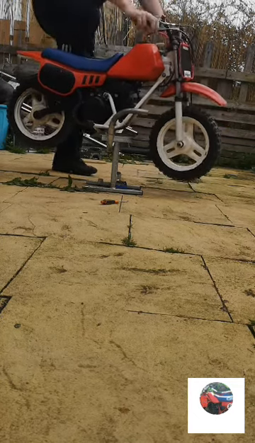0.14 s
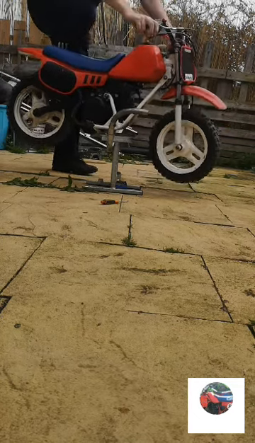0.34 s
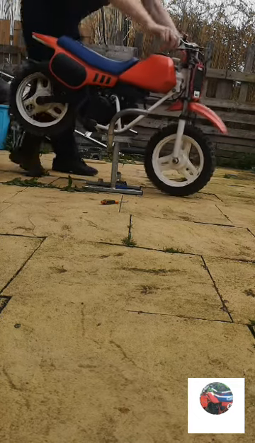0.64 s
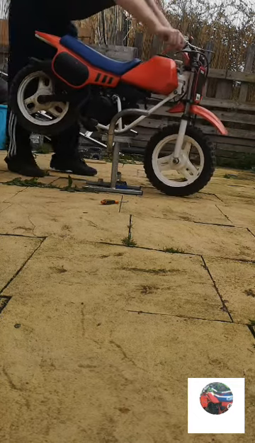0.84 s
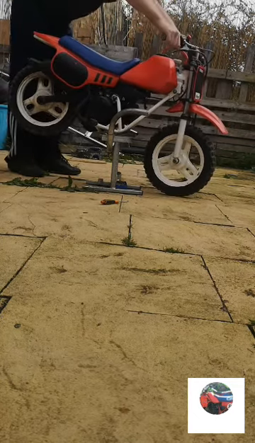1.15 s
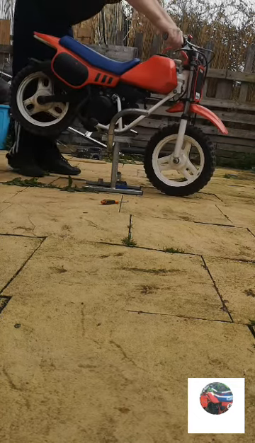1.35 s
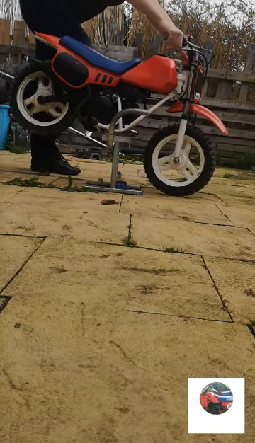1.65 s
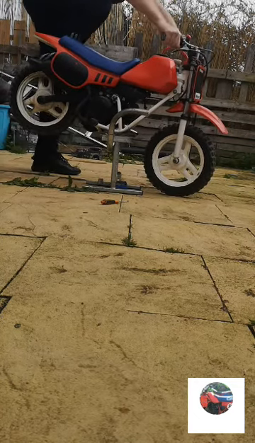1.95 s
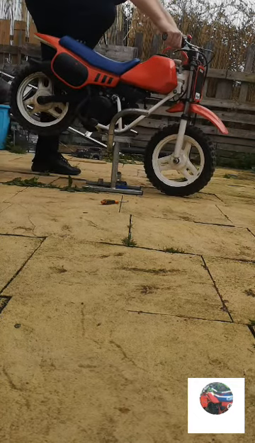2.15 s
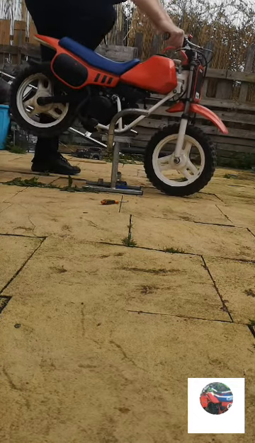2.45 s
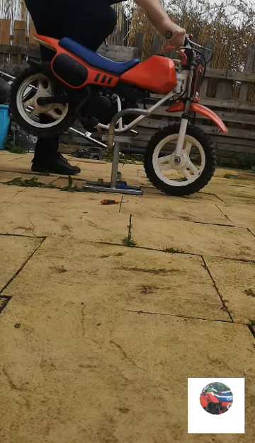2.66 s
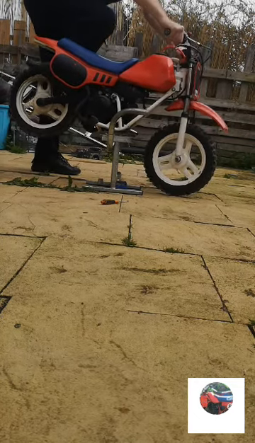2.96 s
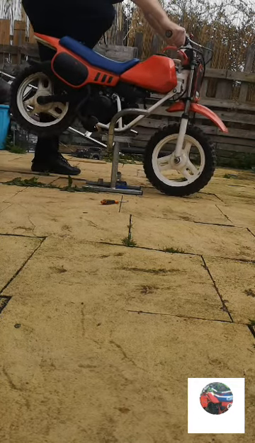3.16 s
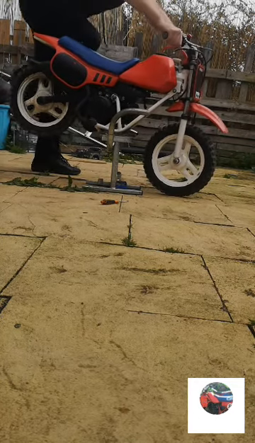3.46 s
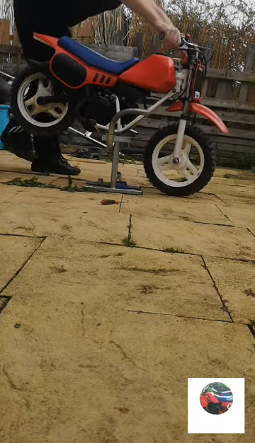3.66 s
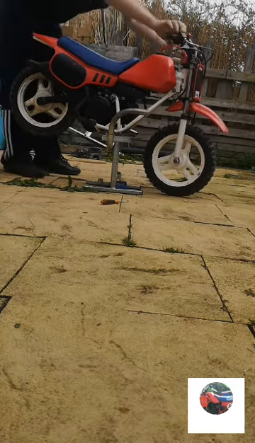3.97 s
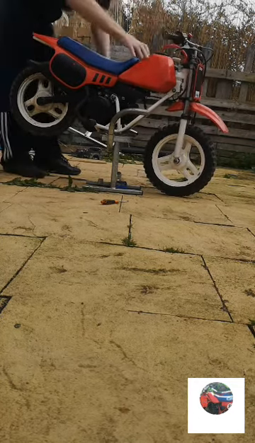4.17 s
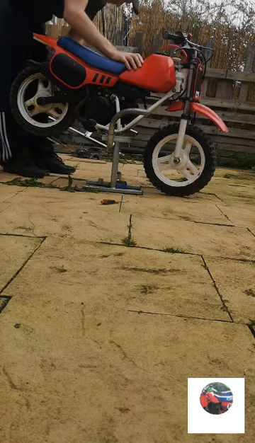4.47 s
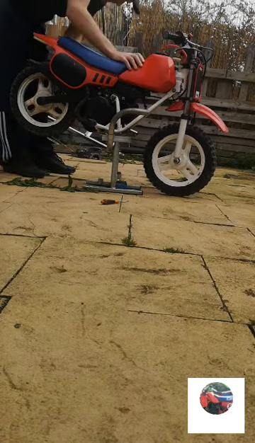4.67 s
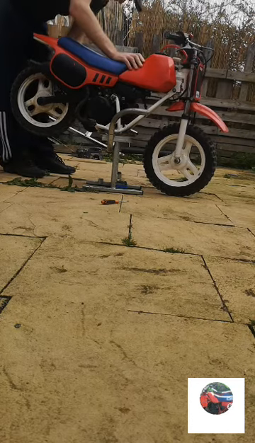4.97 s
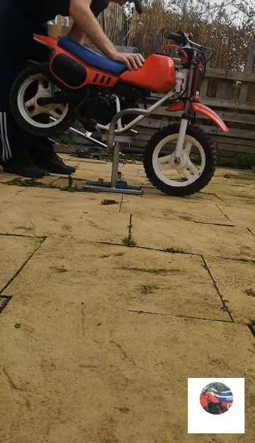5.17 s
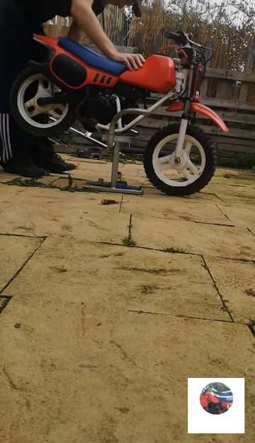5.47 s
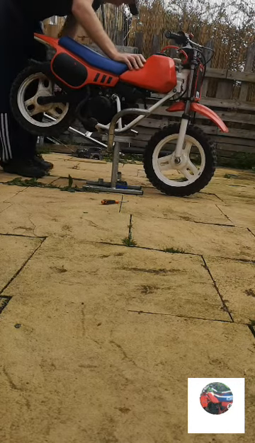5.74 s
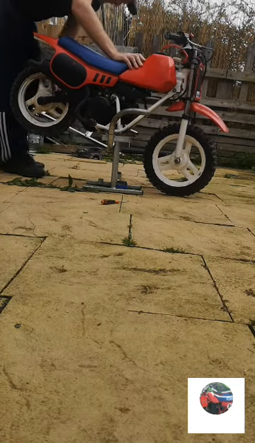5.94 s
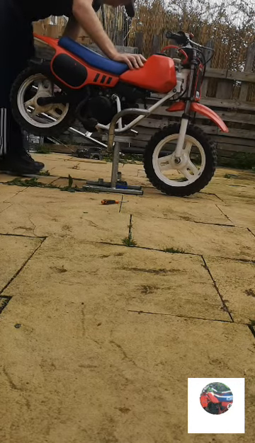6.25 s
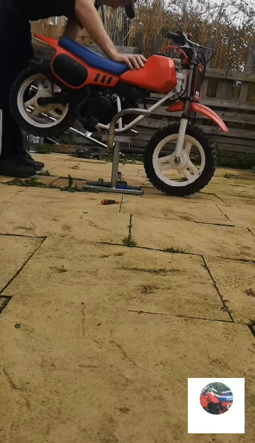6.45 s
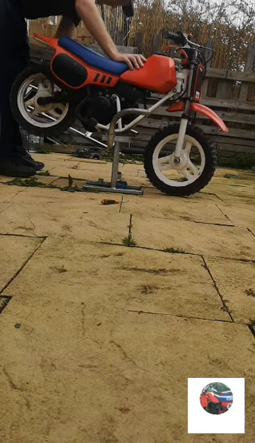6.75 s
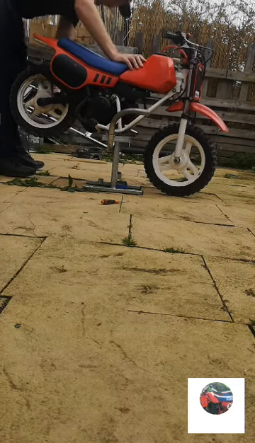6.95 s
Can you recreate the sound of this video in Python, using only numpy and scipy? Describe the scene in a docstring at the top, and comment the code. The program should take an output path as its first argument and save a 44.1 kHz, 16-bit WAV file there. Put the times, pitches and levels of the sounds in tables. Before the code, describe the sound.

A small motorbike rocks on its steel stand close to the microphones in a paved yard. After faint scuffs, a sharp, briefly ringing clank at 0.5 seconds is the loudest sound; a second follows at 0.8, and the front tyre lands with a dull, rattling thud at 0.9. A shoe scuffs at 1.2. The middle is quiet, with tiny ticks, a hoarse distant bird and a songbird on the left singing faintly from 1.5 to 2.4. Traffic rumbles softly throughout, and a faint motor hum comes nearer around 4 seconds. Soft scuffs and barely audible sleeve rubbing follow from 4.3. The songbird twitters, then repeats its phrase more clearly from 4.8, ending in a falling whistle at 5.6 as the harsher bird calls. The kick lever clacks against its stop at 5.4, 6.5 and 7 seconds, with lighter knocks between. The engine never fires.

```python
"""A paved yard, a stereo pair of microphones close to a small motorbike. It rocks on its steel stand:
two sharp clanks set stand and frame ringing, then the front tyre lands with a thud. Shoes scuff, sleeves
rub and the kick lever knocks on its stop; the engine never fires. Off to the left a songbird twitters
and whistles its phrase twice, faintly at first. Far off, a harsher bird calls, traffic rumbles and a
humming motor comes nearer."""
import sys
import numpy as np
from scipy import signal
from scipy.fft import rfft, irfft
from scipy.io import wavfile
from scipy.ndimage import uniform_filter1d

SR = 44100
rng = np.random.default_rng(int(sys.argv[2]) if len(sys.argv) > 2 else 0)


def digitize_waveform(pressure):
    """Quantize a signal to 16-bit integers and store it at the path in sys.argv[1].

    Rows of a 2-D input are taken as channels; values are limited to [-1, 1].
    """
    field = np.atleast_2d(pressure).T
    bounded = np.clip(field, -1, 1)
    quanta = np.round(bounded * 32767).astype(np.int16)
    wavfile.write(sys.argv[1], SR, quanta)


N = 313551
T = np.arange(int(.6 * SR)) / SR  # time axis of one impact or echo tail, in seconds


def amp(db):
    """Decibels to amplitude."""
    return 10 ** (np.asarray(db) / 20)


def unit(x):
    """Scales to rms 1."""
    return x / np.sqrt(np.mean(x ** 2) + 1e-20)


def read(points, hz):
    """A table's value on a log-frequency axis."""
    f, value = np.transpose(points)
    return np.interp(np.log(hz + 1), np.log(f + 1), value)


def add(mix, start_s, sound):
    """Mixes a sound in at start_s."""
    part = mix[:, max(round(start_s * SR), 0):][:, :sound.shape[-1]]
    part += sound[..., :part.shape[1]]


def hiss(gain, size=len(T)):
    """Two unrelated channels of noise with the spectrum gain(hz)."""
    white = rfft(rng.standard_normal((2, size)))
    return unit(irfft(white * gain(np.fft.rfftfreq(size, 1 / SR)), size))


def body(peaks):
    """The spectrum of damped resonances, each given as centre_hz, width_hz, level_db."""
    return lambda hz: np.sqrt(sum(amp(db) ** 2 / (1 + ((hz ** 2 - centre ** 2) / (width * hz + 1)) ** 2)
                                  for centre, width, db in peaks))


def dying(t60_s, rise_s=.0004):
    """A quick rise and an exponential fall."""
    return (1 - np.exp(-T / rise_s)) * np.exp(-np.log(1000) * T / t60_s)


def wander(size, span_s, per_s=SR):
    """A random drift of rms 1 that changes over span_s."""
    span = max(int(span_s * per_s), 1)
    return unit(uniform_filter1d(uniform_filter1d(rng.standard_normal(size), span), span))


def pan(x, balance):
    """Sets the left-right balance by frequency."""
    side_db = read(balance, np.fft.rfftfreq(N, 1 / SR)) / 2
    return irfft(rfft(x) * amp([side_db, -side_db]), N)


def microphone_pair(x):
    """Two closely spaced microphones hear long waves alike and most short waves differently."""
    # left-right likeness of near sounds: frequency_hz, correlation
    likeness = [(20, 1), (130, 1), (300, 0.0024), (700, 0.23), (1400, 0.95), (2400, 0.11), (16000, 0.14)]
    blend = np.arcsin(np.clip(read(likeness, np.fft.rfftfreq(N, 1 / SR)), 0, 1)) / 2
    spectrum = rfft(x)
    return irfft(np.cos(blend) * spectrum + np.sin(blend) * spectrum[::-1], N)


def yard(x, mean_gap_samples=20):
    """Scatter from slabs and fences: sparse echoes that linger longest in the midrange."""
    # the yard's decay: frequency_hz, t60_s
    decay = [(100, .2), (800, .28), (2000, 0.29), (4500, 0.27), (7000, 0.23), (15000, 0.21)]
    taps = rng.choice([-1., 1.], (2, len(T)))
    taps *= (rng.random(taps.shape) < 1 / mean_gap_samples) * (T > .004)
    hz, t, spectra = signal.stft(taps, SR, nperseg=256)
    fall = np.exp(-np.log(1000) * t / read(decay, hz)[:, None])
    tail = signal.istft(spectra * fall, SR, nperseg=256)[1]
    return signal.fftconvolve(x, tail / np.linalg.norm(tail, axis=1, keepdims=True), axes=1)[:, :N]


def fences(x, count=8, spread_s=0.037):
    """A handful of early echoes that smear far sounds."""
    taps = np.zeros((2, len(T)))
    lateness = rng.random((2, count))
    strength = rng.choice([-1., 1.], lateness.shape) * np.exp(-2 * lateness)
    np.put_along_axis(taps, (lateness * spread_s * SR).astype(int), strength, 1)
    return signal.fftconvolve(x, taps / np.linalg.norm(taps, axis=1, keepdims=True), axes=1)[:, :N]


def approach_db(t, start_s=3.8, length_s=0.75, far_db=-8.5):
    """The far motor's gain as it comes nearer once and stays."""
    return far_db * (1 - np.clip((t - start_s) / length_s, 0, 1))


def traffic_and_air(level_db=-57.5, rumble_hz=110, roar_hz=200, patchy_db=2.5):
    """Distant traffic, alike at both microphones and slowly swelling, under a faint airy hiss."""
    # the background's spectrum: frequency_hz, density_db
    air_spectrum = [(12, -36), (24, 0), (40, -4), (62, -1), (100, -7.5), (140, -11), (195, -16.5),
                    (280, -24.5), (450, -32.5), (1000, -32.5), (2020, -32.5), (4300, -40), (7310, -44),
                    (8890, -48.5), (15000, -50)]
    # its left-right likeness: frequency_hz, correlation
    likeness = [(20, 1), (100, 1), (180, .97), (300, .55), (640, -0.41), (1400, 0.19), (3100, -0.1),
                (16000, 0)]
    frames, hz = N // 1024 + 3, np.fft.rfftfreq(4096, 1 / SR)
    t = np.arange(frames) * 1024 / SR
    left_re, left_im, other_re, other_im, patches = rng.standard_normal((frames, len(hz), 5)).T
    same = np.clip(read(likeness, hz), -1, 1)[:, None]
    left = left_re + 1j * left_im
    right = same * left + np.sqrt(1 - same ** 2) * (other_re + 1j * other_im)
    sheen_db = 4 * np.exp(-((hz - 7550) / 250) ** 2)
    rumble_band = 1 / (1 + (hz[:, None] / rumble_hz) ** 4)
    roar_band = np.exp(-np.log2((hz + 1) / roar_hz) ** 2)
    patches = unit(uniform_filter1d(uniform_filter1d(patches, 16, 0), 6, 1))
    field_db = (read(air_spectrum, hz) + sheen_db)[:, None] + rumble_band * wander(frames, .4, 1 / t[1])
    field_db += np.outer(roar_band, 3 + .3 * approach_db(t))  # the roar grows with the far motor
    field_db += patchy_db * (1 - 0.6955 * rumble_band) * patches  # the bass flickers least
    air = signal.istft(np.array([left, right]) * amp(field_db), nperseg=4096, noverlap=3072)[1]
    return amp(level_db) * unit(air[:, :N])


def far_motor(waver=.012):
    """A distant motor's low tones, drifting together in pitch."""
    # its hum at the nearest: pitch_hz, level_db
    hum = [(112, -71.5), (196, -73)]
    t = np.arange(N) / SR
    drift = np.interp(t, np.linspace(0, t[-1], 40), rng.standard_normal(40))
    drifting_s = np.cumsum(1 + waver * drift) / SR
    tones = sum(amp(db) * np.sin(2 * np.pi * (hz * drifting_s + rng.random())) for hz, db in hum)
    return np.sqrt(2) * tones * amp(approach_db(t))


def far_bird(call_s=0.0557, roughness=0.072, fall=0.105):
    """A hoarse falling call whose second harmonic carries across the gardens."""
    # the calls: start_s, second_harmonic_hz, level_db
    calls = [(0.951, 2065, -64.5), (1.947, 2046, -72.5), (2.925, 2070, -63), (3.896, 2007, -69.5),
             (5.32, 2795, -69.5), (5.33, 2016, -72.5), (5.519, 3280, -67), (5.603, 2160, -53.5),
             (5.968, 1426, -67.5), (6.036, 1500, -72), (6.405, 2200, -67)]
    out = np.zeros((2, N))
    progress = np.linspace(0, 1, int(call_s * SR))
    for start_s, hz, db in calls:
        jitter = unit(uniform_filter1d(rng.standard_normal(len(progress)), 40))
        pitch_hz = hz / 2 * (1 + fall * (.5 - progress) + roughness * jitter)
        phase = 2 * np.pi * np.cumsum(pitch_hz) / SR
        call = amp(-17.5) * np.sin(phase) + np.sin(2 * phase) + amp(-18) * np.sin(3 * phase)
        add(out, start_s, amp(db) * call * signal.windows.tukey(len(call), .5))
    return amp(-1.5) * out + amp(2) * yard(out)


def syllable(name, db, tilt_db=0, pivot_hz=4500, buzz_hz=290):
    """A whistled slide that levels off; rising ones buzz, the falling one is pure and wavers a little."""
    # the songbird's slides by name: first_hz, last_hz, length_s, level_db, buzz_share_of_pitch
    slides = {"low": (3080, 3610, .026, -3.5, .03), "chip": (3800, 4320, .02, 0, .03),
              "mid": (4480, 5100, .024, 0, .035), "pip": (5540, 6180, .029, -1, .025),
              "under": (3350, 4140, .04, -5, .04), "slur": (4780, 5850, .052, 0, .04),
              "flick": (5420, 7850, .015, -5, .03), "high": (7200, 7840, .028, 1.5, .025),
              "buzz": (3820, 4980, .052, 3, .05), "whistle": (5380, 4715, .118, 12, 0)}
    first_hz, last_hz, length_s, own_db, buzz = slides[name]
    progress = np.linspace(0, 1, int(length_s * SR))
    arch = np.abs(np.sin(np.pi * progress))
    hz = last_hz + (first_hz - last_hz) * (1 - progress) ** 2.03
    jitter = unit(uniform_filter1d(rng.standard_normal(len(hz)), 50))
    if last_hz > first_hz:
        hz *= 1 + buzz * np.sin(2 * np.pi * buzz_hz * length_s * progress) + 0.018 * jitter
    else:
        hz *= 1 + 0.003 * jitter + 0.0048 * wander(len(hz), 0.0099) - 0.017 * arch
    gain = amp(db + own_db + tilt_db * np.log2(hz / pivot_hz))
    return gain * np.sin(2 * np.pi * np.cumsum(hz) / SR) * arch ** 1.43


def songbird(crescendo_db_per_s=6.5, left_lead_s=.0007):
    """Off to the left, loose twitters lead into a swelling phrase; the fences throw it back."""
    # loose notes: start_s, syllable, level_db
    twitters = [(1.005, "low", -67), (1.341, "chip", -72.5), (1.405, "mid", -72.5), (3.35, "low", -64),
                (3.409, "mid", -73), (3.852, "buzz", -76), (3.958, "chip", -64), (4.414, "mid", -65),
                (4.48, "low", -58), (4.548, "mid", -60.5), (4.61, "low", -63.5), (4.672, "high", -72)]
    # a ladder, three high flourishes and a falling whistle: offset_s, syllable
    phrase = [(0, "low"), (.083, "chip"), (0.125, "pip"), (.134, "mid"), (.21, "low"), (.259, "flick"),
              (0.271, "high"), (.315, "buzz"), (0.382, "flick"), (.4, "high"), (.474, "under"),
              (.484, "slur"), (.614, "flick"), (.631, "high"), (.671, "buzz"), (.746, "flick"),
              (.777, "whistle")]
    # the phrase sung twice, first faint and dull: start_s, level_db, tilt_db_per_octave
    songs = [(1.503, -73, -7), (4.757, -59.5, -1)]
    out = np.zeros((2, N))
    for start_s, name, db in twitters:
        add(out, start_s, syllable(name, db))
    for start_s, db, tilt_db in songs:
        for offset_s, name in phrase:
            add(out, start_s + offset_s, syllable(name, db + crescendo_db_per_s * offset_s, tilt_db))
    direct = np.array([amp(3) * out[0], amp(-7.5) * np.roll(out[1], round(left_lead_s * SR))])
    return direct + amp(1) * fences(out) + amp(-8) * yard(out)


def sleeves(grain_db=1.5, clump_db=2.0, fade_s=.08):
    """Synthetic cloth whispers in a narrow high band as the rider leans over the seat."""
    # sleeves sliding on the seat: start_s, length_s, level_db
    rustles = [(4.35, 0.55, -82.5), (4.78, .62, -88), (5.381, .72, -82)]
    out = np.zeros((2, N))
    for start_s, length_s, db in rustles:
        t = np.arange(int(length_s * SR)) / SR
        whisper = hiss(lambda hz: body([(7600, 2600, 0)])(hz) ** 2 / (1 + (hz / 10000) ** 12), len(t))
        grains = amp(grain_db * wander(len(t), .006) + clump_db * wander(len(t), 0.034))
        fade = np.clip(np.minimum(t, length_s - t) / fade_s, 0, 1)
        add(out, start_s, amp(db) * whisper * grains * fade)
    return out


def scuffs(grain_db=1.5, clump_db=2.5):
    """Friction in uneven grains and clumps, coloured by the sole's squeaky resonance."""
    # soles on the slabs and rubbing cloth: start_s, length_s, level_db, tilt_db_per_octave
    strokes = [(0.095, 0.084, -63.5, -2.5), (0.241, 0.023, -67.5, -14), (1.204, 0.056, -53, 0.2),
               (1.523, 0.036, -73, -3.5), (4.348, 0.33, -73, 0), (4.5, .1, -65.5, -3),
               (4.6, 0.18, -82, -0.5), (5.971, 0.11, -75, 2), (6.878, 0.22, -77, -8)]
    # a rubbing sole's spectrum: frequency_hz, density_db
    sole = [(200, -46), (380, -21), (620, -14), (950, -13), (1600, -9.5), (1950, -5.5), (2280, -2),
            (2800, -8), (3900, -17), (5400, -10), (6400, -16), (7700, -10.5), (8800, -21), (14500, -32.5),
            (16000, -47)]
    out = np.zeros((2, N))
    for start_s, length_s, db, tilt_db in strokes:
        size = int(length_s * SR)
        rub = hiss(lambda hz: amp(read(sole, hz) + tilt_db * np.log2(np.clip(hz, 500, 8000))), size)
        fine, slow = rng.standard_normal((2, size))
        grains = np.minimum(unit(uniform_filter1d(uniform_filter1d(fine, 70), 70)), 2)
        clumps = unit(uniform_filter1d(slow, 700))
        swell = np.abs(np.sin(np.pi * np.linspace(0, 1, size) ** 0.88))
        add(out, start_s, amp(db) * unit(rub * amp(grain_db * grains - clump_db * clumps) * swell))
    return out + amp(-8.5) * yard(out)


def clicks():
    """Tiny bright ticks of loose parts and grit."""
    # the ticks: start_s, level_db, centre_hz
    ticks = [(.357, -67, 7500), (0.3942, -56, 7700), (0.8943, -46.5, 7400), (1.049, -67, 7500),
             (2.91, -63.5, 5500), (3.255, -70, 7750), (4.8367, -57.5, 7400), (6.2653, -58, 5530)]
    out = np.zeros((2, N))
    for start_s, db, centre_hz in ticks:
        tick = hiss(lambda hz: body([(centre_hz, 2600, 0)])(hz) / (1 + (hz / 11000) ** 6))
        add(out, start_s, amp(db) * tick * dying(.03))
    return out + amp(-5.5) * yard(out)


def kick_lever():
    """The lever meets its stop: a short clack in a few damped resonances."""
    # the knocks: start_s, level_db, crack_db
    knocks = [(1.299, -65.5, -11), (4.728, -62, -3), (5.448, -40.5, -2), (6.127, -69, 8),
              (6.500, -48.5, -3.5), (6.778, -66, -2), (6.832, -64.5, -7), (6.95, -62, -2.5),
              (7.031, -40.5, -4.5)]
    # the lever's resonances: centre_hz, width_hz, level_db
    lever_peaks = [(1550, 190, 8.5), (1799, 60, 9.5), (2010, 45, 6), (2650, 89, 6), (3400, 120, 0),
                   (3860, 360, 4), (4730, 400, -32), (6200, 1200, -30)]
    out = np.zeros((2, N))
    lever = lambda hz: body(lever_peaks)(hz) / np.sqrt(
        (1 + (1250 / (hz + 1)) ** 8) * (1 + (hz / 6000) ** 6))
    for start_s, db, crack_db in knocks:
        clack = amp(-2.5) * hiss(lever) * dying(.14, rise_s=0.00085)
        crack = amp(crack_db) * hiss(lever) * dying(0.029, rise_s=0.0011)
        thud = amp(-26.5) * hiss(lambda hz: body([(600, 400, 0)])(hz) ** 2) * dying(0.19, rise_s=0.0027)
        add(out, start_s, amp(db) * (clack + crack + thud))
    return out + amp(-15) * yard(out)


def tyre_landing(tyre_hz=84, casing_hz=150):
    """The tyre gives a dull bounce and a broad drumming thud while fork and mudguard rattle."""
    # tyre and fork coming down: start_s, push_db, rattle_db
    bounces = [(.847, -34, -38), (0.86, -56, -43), (0.8913, -38.5, -35.5), (.906, -44.5, -43)]
    # the fork's resonances: centre_hz, width_hz, level_db
    fork_peaks = [(680, 780, -14.5), (850, 59, -10.5), (1140, 71, -15), (1300, 92, 0), (1990, 240, -8.5),
                  (2560, 190, -10), (3850, 190, -16.5), (7600, 1000, -22)]
    out = np.zeros((2, N))
    fork = lambda hz: body(fork_peaks)(hz) / (1 + (hz / 8500) ** 6)
    drum = lambda hz: body([(casing_hz, 110, 0), (240, 60, -4)])(hz) / (1 + (hz / 380) ** 4)
    for start_s, push_db, rattle_db in bounces:
        push = amp(1) * np.sin(2 * np.pi * tyre_hz * T) * dying(0.054, rise_s=0.00067)
        casing = amp(-9.5) * hiss(drum)[0] * dying(0.27, rise_s=0.0017)
        rattle = hiss(fork) * dying(.11, rise_s=0.002)
        add(out, start_s, amp(push_db) * (push + casing) + amp(rattle_db) * rattle)
    return out + amp(-12.5) * yard(out)


def stand_ring(split=0.0017, longest_t60_s=.25):
    """Steel modes, each beating with a weaker twin, in a different phase at each microphone."""
    # the stand's modes: pitch_hz, level_db, uncapped_t60_s
    modes = [(789, -15.5, 0.12), (1522, -11.5, 0.22), (1734, -9.5, .2), (2540, -19.5, .24),
             (3540, -14, 0.33), (4050, -8, 0.18), (4455, -15.5, 0.45), (5047, -8, .2), (5220, -1.5, .21),
             (5240, -1, .22), (5394, -6, .19), (5539, -9, .19), (5636, -5.5, .21), (5900, -8.5, .19),
             (6151, -8, 0.19), (6500, -7.5, 0.092), (6707, -0.5, .18), (7230, 4, .19), (6980, -1.5, 0.14),
             (7370, 1, 0.13), (7640, -9.5, .12), (8030, -13.5, 0.25), (8787, -12, .13), (9870, -14.5, 0.13),
             (11290, -21.5, 0.17), (14390, -15, .09)]
    out = np.zeros((2, len(T)))
    for hz, db, t60_s in modes:
        fall = dying(min(t60_s, longest_t60_s))  # no mode rings longer than a quarter second
        for detune, share in ((0, 1), (split * rng.standard_normal(), .5)):
            cycles = hz * (1 + detune) * T + rng.random((2, 1))
            out += share * amp(db) * fall * np.sin(2 * np.pi * cycles)
    return out / np.sqrt(sum(amp(db) ** 2 for _, db, _ in modes))


def stand_clanks():
    """A brief bright crack of contact; the stand rings on, the frame rattles, the panels answer."""
    # steel hitting steel: start_s, level_db, stand_db, frame_db, crack_db, rise_s
    hits = [(0.465, -45.5, -6.5, -4.5, -8, 0.00033), (0.4998, -24, -3.5, -11.5, 6, 0.00016),
            (0.7268, -65, -1.5, -2.5, -11, 0.0014), (0.773, -59, -7, 0.5, -15, 0.00076),
            (0.7795, -36, -33, 4, 5, 0.0025)]
    # struck steel's spectrum, before a treble cut: frequency_hz, density_db
    steel_spectrum = [(300, -51.5), (520, -31), (770, -12.5), (1080, -22.5), (1650, -9), (2150, -16),
                      (3000, -14), (3900, 2), (4650, -6.5), (5220, 5), (6300, -3), (7350, -1.5),
                      (8400, -7.5), (11900, -27), (14800, -25), (16000, -54)]
    # the frame's resonances: centre_hz, width_hz, level_db
    frame_peaks = [(792, 130, -6.5), (1289, 97, -7), (2016, 66, 0.5), (2596, 200, -1), (3540, 130, -2),
                   (3890, 200, 3), (5380, 160, 6), (5670, 400, -5), (6800, 300, -14.5), (7414, 240, 0.5),
                   (7640, 300, -6.5), (9000, 600, -10), (11100, 750, -13.5)]
    # hollow tank and panels, squared to sharpen them: centre_hz, width_hz, level_db
    panel_peaks = [(775, 70, 0), (1554, 90, 0), (1710, 77, -1)]
    out = np.zeros((2, N))
    steel = lambda hz: amp(read(steel_spectrum, hz) - 5 * np.clip((hz - 9000) / 3000, 0, 1))
    frame = lambda hz: body(frame_peaks)(hz) / np.sqrt(
        (1 + (600 / (hz + 1)) ** 8) * (1 + (hz / 11500) ** 8))
    for start_s, db, stand_db, frame_db, crack_db, rise_s in hits:
        attack = np.minimum(T / rise_s, 1) ** 2
        contact = 1 / (1 + (T / (rise_s + 0.0023)) ** 8)
        crack = hiss(lambda hz: steel(hz) * hz / np.hypot(hz, 2500))
        crack += amp(-19) * hiss(body([(14500, 400, 0)]))
        ringing = amp(stand_db) * stand_ring() + amp(frame_db) * hiss(frame) * dying(0.17)
        wash = amp(-3.5) * hiss(steel) * dying(.13)
        panels = amp(-17) * hiss(lambda hz: body(panel_peaks)(hz) ** 2) * dying(.17, rise_s=.003)
        clank = amp(2.5) * ringing + wash + panels + amp(crack_db) * crack * contact
        add(out, start_s, amp(db) * clank * attack)
    return out + amp(-12) * yard(out)


def scene():
    """Bike and rider close to the microphones, birds beyond them, traffic in the distance."""
    # balance of bike, rider and birds: frequency_hz, left_minus_right_db
    source_balance = [(100, 0.5), (250, 1.5), (700, 2.5), (1400, 0), (2400, 4.5), (4400, 3), (7500, 7.5),
                      (9000, -1), (10500, -2), (15000, -6.5)]
    # balance of traffic and air: frequency_hz, left_minus_right_db
    air_balance = [(140, -0.5), (500, 2), (3000, 1), (7000, 2.5), (10000, 0)]
    near = microphone_pair(stand_clanks() + tyre_landing() + kick_lever()
                           + clicks() + scuffs() + sleeves())
    sources = pan(near + songbird() + far_bird(), source_balance)
    return sources + pan(traffic_and_air(), air_balance) + far_motor()


def record(dry):
    """The recorder's band limit."""
    edge_hz = 15400
    lowpass = signal.firwin(255, edge_hz, window=("kaiser", 8), fs=SR)
    return signal.oaconvolve(dry, lowpass[None], "same", axes=1)


dry = scene()
out = record(dry)
digitize_waveform(out)
```